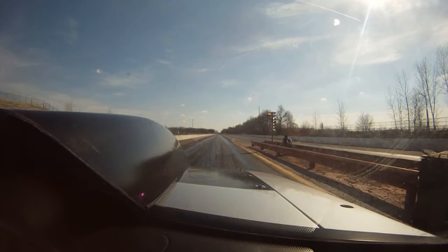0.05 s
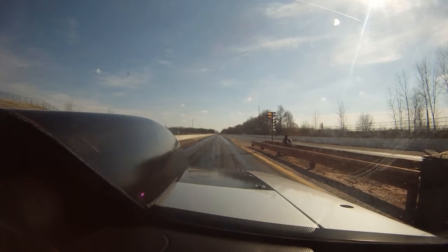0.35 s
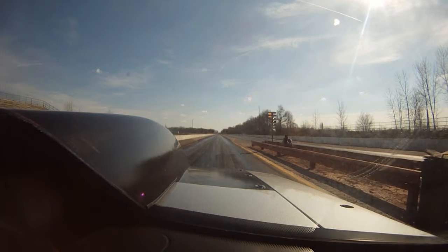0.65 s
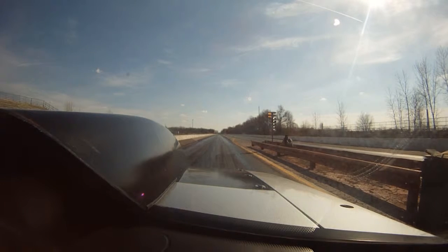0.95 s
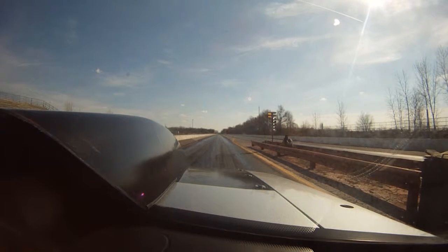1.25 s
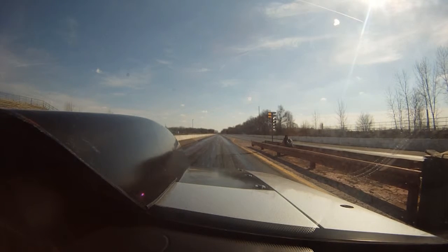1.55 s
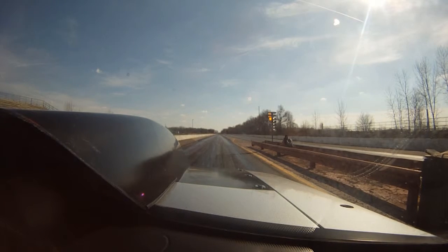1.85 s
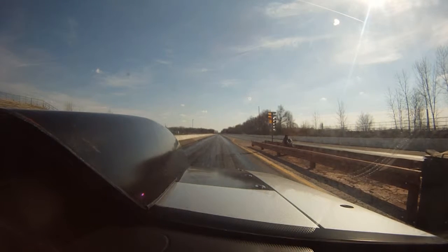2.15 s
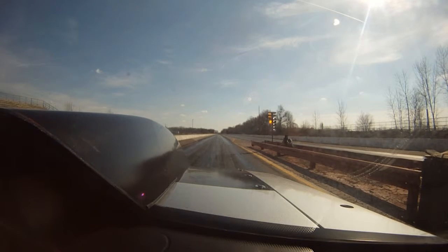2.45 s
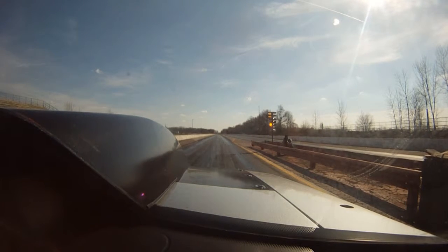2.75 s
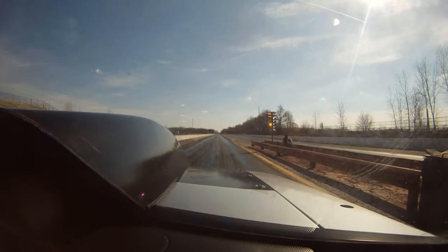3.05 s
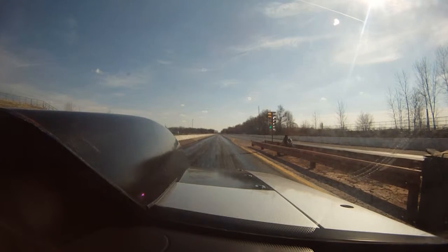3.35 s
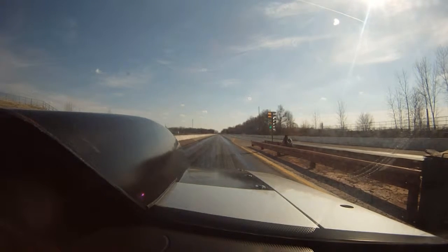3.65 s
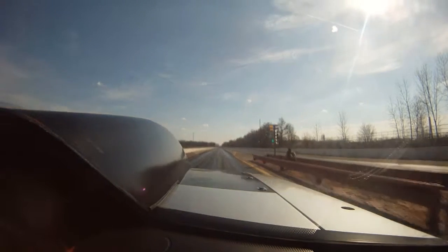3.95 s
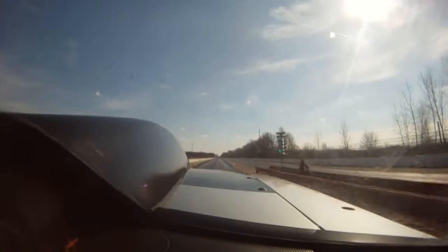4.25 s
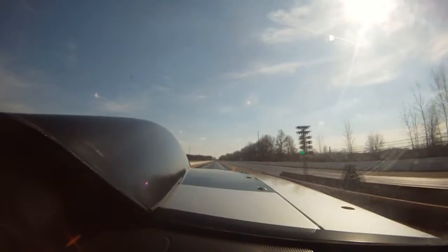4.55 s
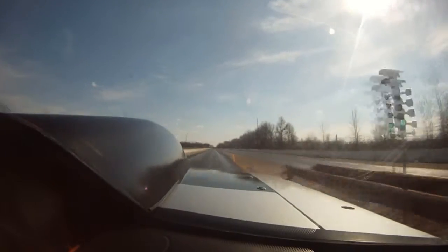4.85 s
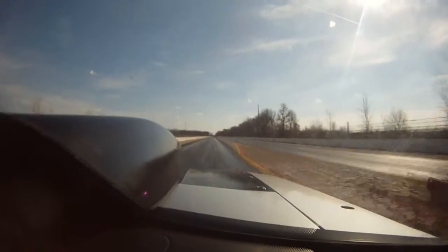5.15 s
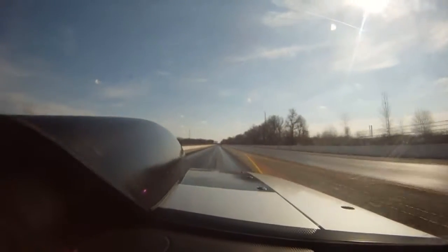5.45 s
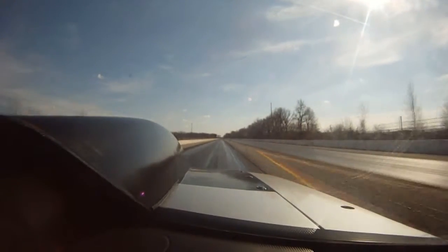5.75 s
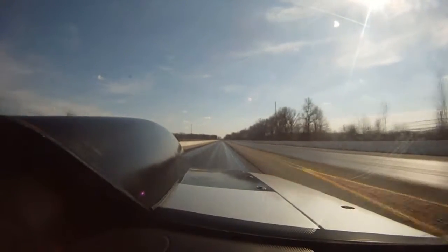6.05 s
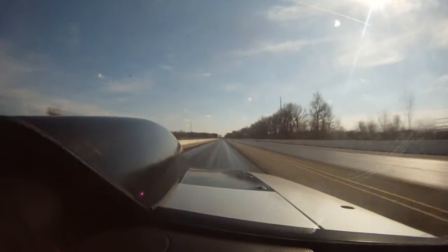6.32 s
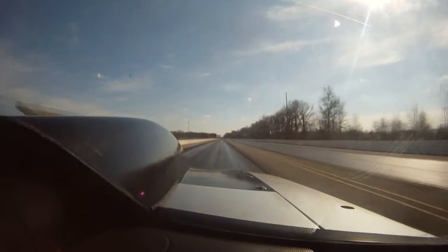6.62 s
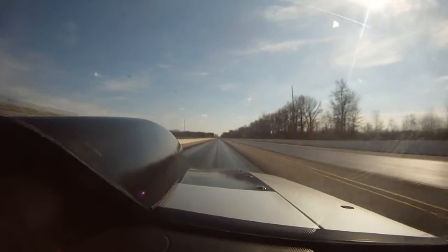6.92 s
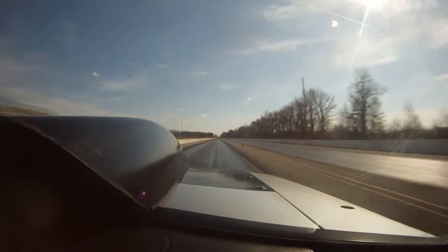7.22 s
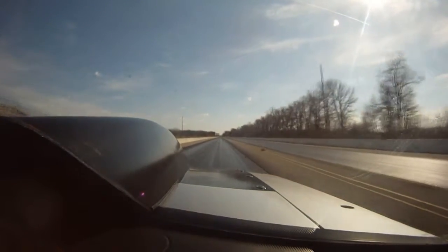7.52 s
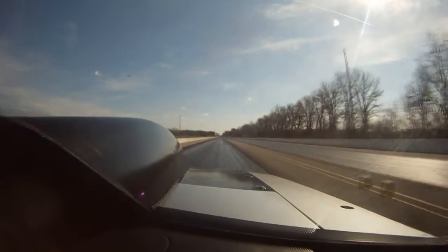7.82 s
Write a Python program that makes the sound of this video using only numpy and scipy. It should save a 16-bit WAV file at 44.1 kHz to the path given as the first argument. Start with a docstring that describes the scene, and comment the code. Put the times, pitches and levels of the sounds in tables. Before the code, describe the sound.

A V8 race car rumbles at a lumpy idle on a drag strip, with low thumps and small ticks from the trim. Its revs rise against the brake before the throttle opens and the chassis clunks. The engine booms and rasps through the bodywork, accelerating through two upshifts over a climbing drone. The sound is close and slightly fizzy, picked up in mono from the dashboard.

```python
"""A V8 drag car, heard from the cabin. It lopes at idle, hard firings thumping and ticking the trim.
Held against the brake, the revs climb; then it launches with a clunk and shifts up twice, the driveshaft
droning ever higher. Eight uneven firings per engine cycle boom through the pipes and cabin and rasp in
the bodywork. Throughout, the dashboard camera holds each sample of a slow converter, which mirrors the
sound into a treble fizz."""
import sys
import numpy as np
from scipy import signal
from scipy.fft import rfft, irfft, next_fast_len
from scipy.io import wavfile
from scipy.ndimage import uniform_filter1d, minimum_filter1d, map_coordinates

SR = 44100
rng = np.random.default_rng(int(sys.argv[2]) if len(sys.argv) > 2 else 0)


def dump(signal):
    """Clip the signal to [-1, 1] and save it as 16-bit WAV at the path in sys.argv[1]."""
    limited = np.clip(np.atleast_2d(signal).T, -1, 1)
    pcm = np.round(limited * 32767).astype(np.int16)
    wavfile.write(sys.argv[1], SR, pcm)


N = 356328


def amp(db):
    """Decibels to gain."""
    return 10 ** (np.asarray(db) / 20)


def steady(x):
    """Ride the level to a running rms of 1."""
    return x / np.sqrt(np.abs(uniform_filter1d(x ** 2, size=SR // 5)) + 1e-20)


def eq_gain(points, hz):
    """Gain of an EQ curve drawn through (freq_hz, level_db) points on a log axis."""
    freq_hz, level_db = np.transpose(points)
    return amp(np.interp(np.log(hz + 1), np.log(freq_hz + 1), level_db))


def automation(rows):
    """One curve, sample by sample, for each column after the time."""
    time_s, *columns = np.transpose(rows)
    return [np.interp(np.arange(N) / SR, time_s, column) for column in columns]


def wobble(rate_hz, size=N):
    """A smooth random curve with rate_hz knots a second."""
    position = np.linspace(0, N * rate_hz / SR, 4096)
    slow = map_coordinates(rng.standard_normal(int(position[-1]) + 4), [position])
    return np.interp(np.linspace(0, position[-1], size), position, slow)


def filtered(x, response):
    """Shape x with a gain that is a function of frequency."""
    size = next_fast_len(N + SR // 2)
    return irfft(rfft(x, size) * response(np.fft.rfftfreq(size, 1 / SR)), size)[:N]


def ring(x, eq):
    """Ring x through a minimum-phase resonator with this EQ curve."""
    size = 2 ** 14
    cepstrum = irfft(np.log(eq_gain(eq, np.fft.rfftfreq(size, 1 / SR)) + 1e-6))
    cepstrum[1:size // 2] *= 2
    cepstrum[size // 2 + 1:] = 0
    impulse_response = irfft(np.exp(rfft(cepstrum)))
    return signal.fftconvolve(x, impulse_response)[:N]


# Resonances of the pipes and cabin: centre_hz, half_width_hz, lift_db
CABIN_RESONANCES = [(40.5, 5.6, 6), (91, 3.2, 5), (115.5, 16.3, 8), (172.6, 19.6, 11.5), (195.5, 6.4, 7.5),
                    (213.9, 14.9, 9.5), (271, 17.6, 12), (306, 15, 7.5), (355.5, 20.6, 6.5), (390, 8.4, 9),
                    (592, 9.5, 8.5), (763, 21.5, 12.5), (963, 31, 15)]
def cabin_lift_db(hz):
    """A tone swells as its pitch passes through a resonance."""
    grid_hz = np.arange(SR // 20)
    lift_db = sum(db * np.exp(-np.minimum(((grid_hz - centre) / width) ** 2, 20))
                  for centre, width, db in CABIN_RESONANCES)
    return np.interp(hz, grid_hz, lift_db)


def driveshaft():
    """The shaft's imbalance drones higher and louder with road speed, beating against the engine."""
    roll_start_s, pitch_after_1s_hz, swell_db_per_s = 4.0, 61.4, .5
    rolled_s = np.maximum(np.arange(N) / SR - roll_start_s, 0)
    pitch_hz = pitch_after_1s_hz * rolled_s ** .56
    level_db = -30.5 + swell_db_per_s * rolled_s + cabin_lift_db(pitch_hz) + 1.8 * wobble(8.7)
    return np.sqrt(2) * amp(level_db) * np.sin(2 * np.pi * np.cumsum(pitch_hz) / SR)


# Hard firings at idle: start_s, tick_db, thump_db
HARD_FIRINGS = [(0.101, -32, -10.5), (0.2767, -36.5, -13), (0.618, -42, -12), (0.7135, -32.5, -7),
                (0.8607, -46.5, -8), (0.9488, -36, -10.5), (1.2418, -32.5, -10.5), (1.481, -42, -16),
                (1.6255, -40.5, -11), (1.6515, -43, -8)]
def idle_knocks():
    """A hard firing thumps, and loose trim ticks just after."""
    t = np.arange(SR // 8) / SR
    thump = np.exp(-t / .0074) * np.sin(2 * np.pi * 125 * t)
    ticks, thumps = np.zeros((2, N))
    for start_s, tick_db, thump_db in HARD_FIRINGS:
        tick = np.exp(-t / .0009) * rng.standard_normal(len(t))
        ticks[round(start_s * SR):][:len(t)] += amp(tick_db) * tick
        thumps[round((start_s - .004) * SR):][:len(t)] -= amp(thump_db) * thump
    trim_eq = [(800, -23), (2000, -3.5), (3500, 10), (5000, 3), (6000, -2.5)]
    thump_eq = [(200, 4.5), (500, -30), (2000, -48)]
    return ring(ticks, trim_eq) + ring(thumps, thump_eq)


# Jolts through the chassis: start_s, level_db
JOLTS = [(4.162, -11.5), (4.177, -13.5), (6.322, -23)]
# The chassis's ring: freq_hz, level_db
CHASSIS_EQ = [(300, -19), (800, -7.5), (1300, -8.5), (1800, 0), (2400, 4.5), (3300, -33.5), (4500, -13.5),
              (5500, -27)]
def chassis_clunks():
    """Each jolt is a short noise burst that rings the chassis."""
    t = np.arange(SR // 8) / SR
    hits = np.zeros(N)
    for start_s, level_db in JOLTS:
        burst = np.exp(-t / .012) * rng.standard_normal(len(t))
        hits[round(start_s * SR):][:len(t)] += amp(level_db + 9.5) * burst
    return ring(hits, CHASSIS_EQ)


# The cylinders in firing order: exhaust_db, rasp_db, rasp_delay_intervals
FIRING_ORDER = [(5.5, 4.5, 0.0075), (-8.5, 5, 0.173), (1.5, 2, -0.1), (0.5, 0, .22), (1, 3, .03),
                (-5, 1, -0.1925), (0, 4, .09), (1, 1.5, -0.052)]
def firings(cycle, strength_db, delay, scatter_db, jitter):
    """One pulse per firing, no two burns alike; delay and jitter are in firing intervals."""
    count = len(FIRING_ORDER)
    firing = np.arange(1, int(cycle[-1] * count) - 1)
    cylinder = firing % count
    timing_draw, level_draw = rng.standard_normal((len(firing), 2)).T
    at = np.interp(firing + delay[cylinder] + jitter * timing_draw, cycle * count, np.arange(N))
    gain = amp(strength_db[cylinder] + scatter_db * np.clip(level_draw, -2, 2))
    sample, spill = at.astype(int), at % 1  # each pulse straddles two samples
    pulses = np.bincount(sample, gain * (1 - spill), N + 1) + np.bincount(sample + 1, gain * spill, N + 1)
    return pulses[:N]


def puffs(pulses, decay_s):
    """Every pulse releases a short burst of turbulence."""
    t = np.arange(SR // 20) / SR
    envelope = signal.fftconvolve(pulses, np.exp(-t / decay_s))[:N]
    return steady(envelope * rng.standard_normal(N))


# Body panels ringing under load: centre_hz, width_hz, level_db
PANEL_MODES = [(535, 45, -11), (777, 65, -5), (978.6, 61, -2), (1150, 76, -1), (1222, 100, -5.5),
               (1270, 26, -25.5), (1497, 18, -5), (1677, 160, -3), (1846, 37, -4), (2126, 217, 5.5),
               (2342, 202, 5.5), (2660, 55, -7.5)]
def panels(hz):
    """Response of the bodywork's modes; little gets through above the last one."""
    modes = sum((-1) ** k * amp(db) * 1j * hz * width / (centre ** 2 - hz ** 2 + 1j * hz * width)
                for k, (centre, width, db) in enumerate(PANEL_MODES))
    return modes * eq_gain([(200, -37.5), (450, 1.5), (2450, -6.5), (2750, -21), (5000, -31.5)], hz)


# Small metal fittings buzzing under load: freq_hz, level_db
FITTINGS_EQ = [(1600, -34), (2700, -0.5), (3130, -10.5), (3560, -5.5), (3680, 1.5), (3800, -5.5),
               (4020, -12.5), (4190, 0.5), (4300, -13.5), (4420, -2.5), (4600, -9.5), (5160, -13.5),
               (5900, -17), (7700, -50)]
# Tappet clatter off load: freq_hz, level_db
TAPPET_EQ = [(260, -8.5), (450, -3.5), (676, -12.5), (752, -3.5), (802, -7), (993, -7.5), (1440, -18),
             (1610, -9.5), (1870, -15.5), (2210, 0), (2440, -9.5), (2570, -22), (3150, -25), (3700, -27),
             (5800, -33), (7540, -81.5), (12800, -120)]
def rasp(cycle, load):
    """The sharp edge of each firing rings panels and fittings; off load only a loose clatter is left."""
    _, strength_db, delay = np.transpose(FIRING_ORDER)
    pulses = firings(cycle, strength_db, delay, scatter_db=1.98, jitter=.007)
    edge = steady(filtered(pulses, panels))
    turbulence = steady(filtered(puffs(pulses, decay_s=.0029), panels))
    sizzle = steady(ring(steady(pulses) + .8 * puffs(pulses, decay_s=.007), FITTINGS_EQ))
    clatter = steady(ring(puffs(pulses, decay_s=.018), TAPPET_EQ))
    loaded = amp(-1.48) * edge + amp(-4) * turbulence + amp(-16) * sizzle
    flutter = amp(.84 * wobble(rate_hz=16))
    return flutter * (load * loaded + (1 - load) * amp(2.42) * clatter)


# The pipes' tone at idle: freq_hz, level_db
IDLE_PIPE_EQ = [(8, -50.5), (28, -5), (41, 1.5), (51, -7), (63, 9), (83, -13.5), (105, 4), (135, -9),
                (150, 0.5), (172, -10.5), (198, -18), (228, -6), (262, -26), (330, -25), (480, -48),
                (1200, -94)]
# The pipes' tone at open throttle: freq_hz, level_db
OPEN_PIPE_EQ = [(8, -60.5), (32, -7.5), (75, -1), (130, -4), (210, -2.5), (290, -16), (400, -23),
                (520, -29.5), (800, -38), (2000, -83.5)]
def exhaust(cycle, load):
    """Uneven pulses rumble down the pipes: a lope at idle, a dense burble under load."""
    strength_db = np.array(FIRING_ORDER)[:, 0]
    no_delay = np.zeros(len(FIRING_ORDER))
    lope = ring(firings(cycle, strength_db, no_delay, scatter_db=1.5, jitter=.13), IDLE_PIPE_EQ)
    burble = ring(firings(cycle, strength_db, no_delay, scatter_db=2, jitter=.21), OPEN_PIPE_EQ)
    return (1 - load) * steady(lope) + load * steady(burble)


# The exhaust's low partials: cycle_multiple, off_load_db, loaded_db
ENGINE_ORDERS = [(2, -35.5, -29), (3, -46, -28.5), (4, -45, -30.5), (5, -36.5, -35), (6, -33, -42),
                 (7, -37, -42), (8, -23, -29.5), (9, -41.5, -42), (10, -28, -49.5), (11, -37, -47),
                 (14, -40.5, -52), (16, -52, -39), (18, -48.5, -54), (20, -50.5, -46.5), (21, -57, -51)]
def boom(cycle, speed_hz, load, rumble_db):
    """The firing note and its neighbouring orders sweep through the resonances, each wavering alone."""
    samples = np.arange(N)
    control = samples[::100]
    speed_hz, load = speed_hz[control], load[control]
    # Off load, orders between the firing note's multiples sink as the rumble dies down.
    sink_db = 1.1 * np.minimum(rumble_db[control] + 22.5, 0)
    unrest = .61 + .39 * load
    angle = 2 * np.pi * (cycle % 1)
    tones = np.zeros(N)
    for order, off_load_db, loaded_db in ENGINE_ORDERS:
        between = order % len(FIRING_ORDER) > 0
        level_db = (1 - load) * (off_load_db + between * sink_db) + load * loaded_db
        waver_db = unrest * (3 if between else 1) * wobble(8, size=len(control))
        gain = amp(level_db + cabin_lift_db(order * speed_hz) + waver_db)
        drift_rad = 2 * np.pi * rng.random() + .82 * wobble(1.592, size=len(control))
        phase = order * angle + np.interp(samples, control, drift_rad)
        tones += np.interp(samples, control, gain) * np.sin(phase)
    return np.sqrt(2) * tones


# Revs through idle, staging, launch and two shifts (a cycle is two crank turns): time_s, cycle_hz
REVS = [(0.0, 11.03), (1.58, 10.9), (1.88, 14.8), (2.57, 17.2), (3.06, 20.95), (3.52, 22.4), (3.86, 20.85),
        (4.03, 34.9), (4.17, 39.7), (4.35, 41.75), (5.01, 45.8), (5.35, 50.6), (5.45, 50.65), (5.55, 46.6),
        (5.73, 44.7), (6.09, 45.75), (6.5, 46.85), (7.18, 49.85), (7.39, 51.7), (7.48, 50.75), (7.7, 52.95),
        (7.85, 46.3), (8.08, 45.15)]
# How hard the engine pulls and bites: time_s, load_fraction, rasp_db
THROTTLE_MOVES = [(0, 0.13, -43.5), (1.6, 0, -43.5), (1.85, 0, -49), (2.45, 0, -46), (2.92, 0.33, -39.5),
                  (3.15, 0.26, -45), (3.87, 0.29, -43.5), (3.91, 0.7, -36.5), (4.05, 0.5, -31.5),
                  (4.2, 0.71, -23), (5.1, 0.88, -23.5), (5.7, 0.92, -26), (5.92, 0.99, -24),
                  (6.7, 0.94, -21.5), (8.08, 1, -26)]
# Uneven burning, least against the brake, barking as the throttle opens: time_s, rumble_db
RUMBLE_FADER = [(0, -16), (1.65, -16.5), (1.85, -23.5), (2.7, -21), (2.9, -14.5), (3.15, -32.5),
                (3.85, -29), (3.92, -17.5), (4.07, -26), (4.25, -13.5), (4.8, -22), (5.4, -17.5),
                (5.8, -22.5), (6.8, -21.5), (7.2, -17.5), (8.08, -24)]
def engine():
    """The crank drives rumble, boom and rasp; its speed hunts at idle and steadies with revs."""
    flywheel_s, lope_below_hz, lope_fade_hz = .06, 12.4, 1.36
    speed_hz = uniform_filter1d(automation(REVS)[0], size=int(flywheel_s * SR), mode="nearest")
    loping = np.clip((lope_below_hz - speed_hz) / lope_fade_hz, 0, 1)
    hunting = (.00098 + .01182 * loping) * wobble(12)
    cycle = np.cumsum(speed_hz * (1 + hunting)) / SR
    load, rasp_db = automation(THROTTLE_MOVES)
    rumble_db, = automation(RUMBLE_FADER)
    rumble = amp(rumble_db) * exhaust(cycle, load)
    note = (1 - loping) * boom(cycle, speed_hz, load, rumble_db)  # a loping engine holds no note
    return rumble + note + amp(rasp_db) * rasp(cycle, load)


def scene():
    """The mono cabin mix: engine up front, shaft drone and knocks behind it."""
    return (engine() + driveshaft() + idle_knocks() + chassis_clunks())[None]


def limiter(x, ceiling):
    """The gain ducks just ahead of any peak that would pass the ceiling."""
    needed = ceiling / np.maximum(np.abs(x), ceiling)
    return x * uniform_filter1d(minimum_filter1d(needed, size=SR // 40), size=SR // 40)


def record(dry):
    """After the limiter, holding each sample mirrors the sound about the converter's rate as fizz."""
    band_hz, hold_hz, top_hz = 5600, 12000, 15250
    limited = limiter(dry[0], ceiling=.76)
    band = filtered(limited, lambda hz: 1 / np.sqrt(1 + (hz / band_hz) ** 40))
    mirrored = band * (1 + 2 * np.cos(2 * np.pi * hold_hz * np.arange(N) / SR))
    return filtered(mirrored, lambda hz: np.sinc(hz / hold_hz) * (hz < top_hz))[None]  # the hold's droop


dry = scene()
out = record(dry)
dump(out)
```